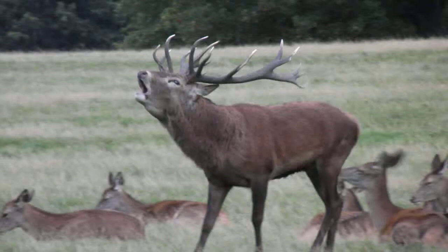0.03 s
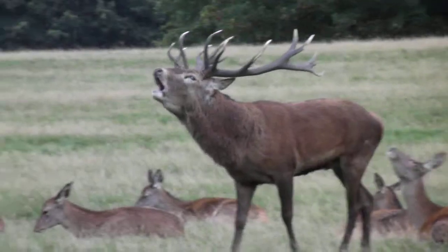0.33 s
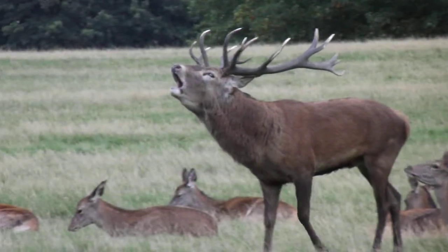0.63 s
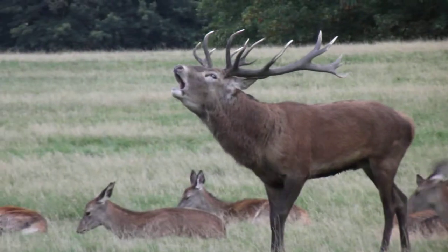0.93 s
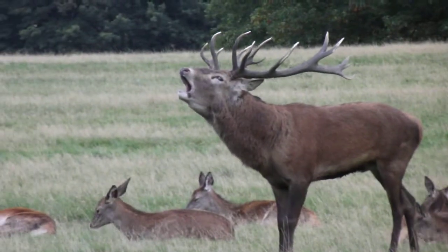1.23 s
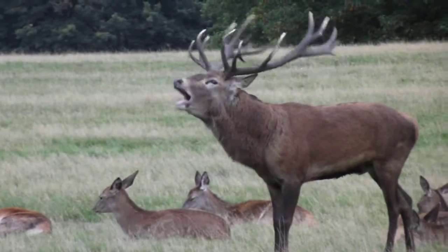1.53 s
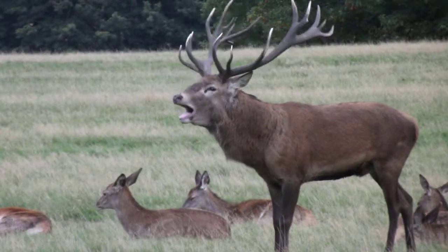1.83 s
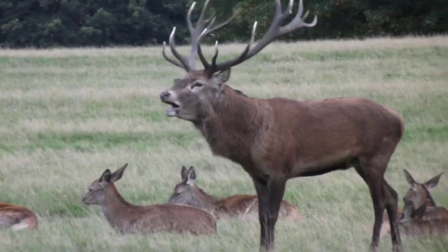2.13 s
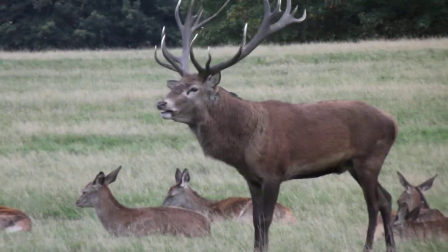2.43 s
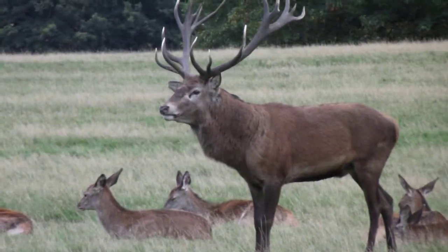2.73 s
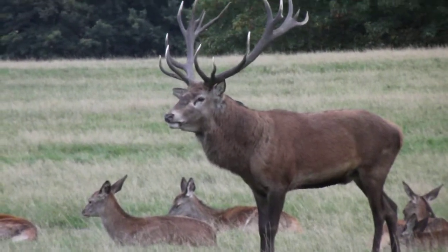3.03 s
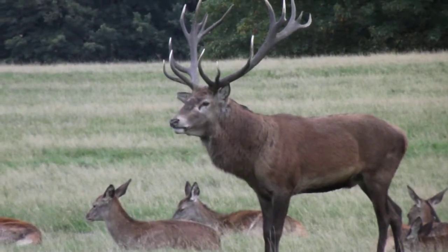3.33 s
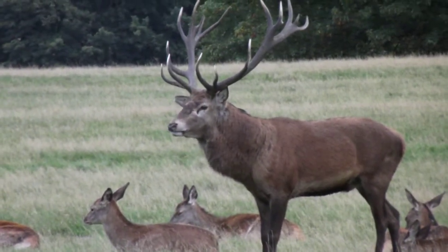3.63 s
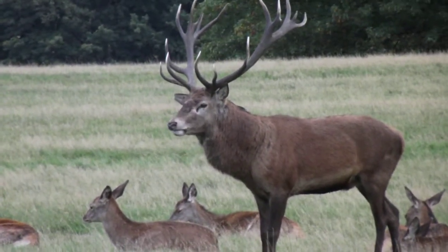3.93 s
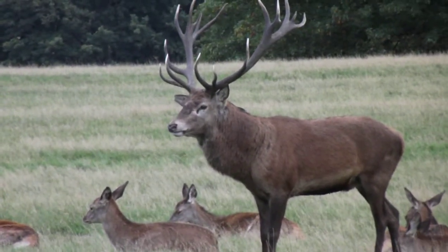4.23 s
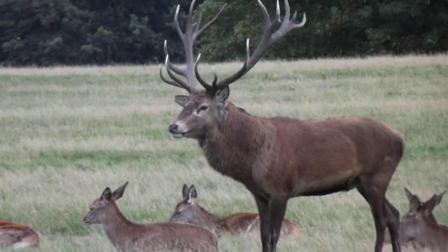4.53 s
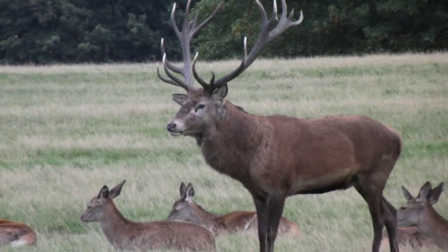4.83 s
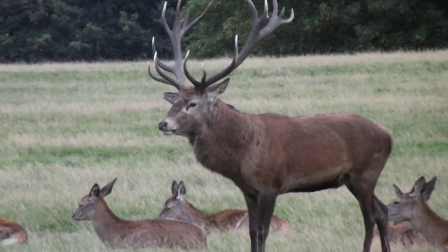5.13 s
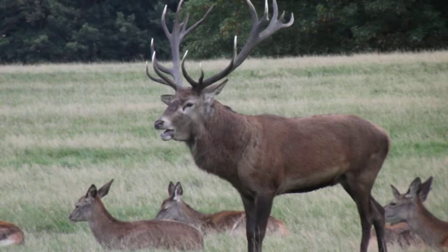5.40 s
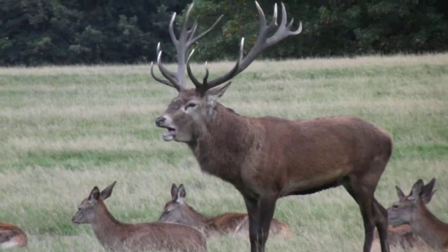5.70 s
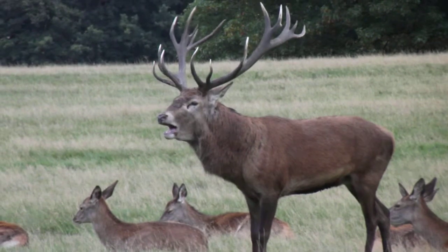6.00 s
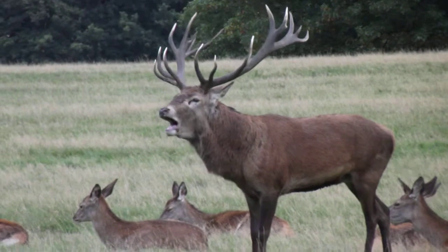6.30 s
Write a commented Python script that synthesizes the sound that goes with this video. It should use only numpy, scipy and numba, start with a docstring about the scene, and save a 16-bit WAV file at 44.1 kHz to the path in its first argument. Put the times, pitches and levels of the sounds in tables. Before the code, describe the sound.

A deer's sustained roar ends in a rasp; faint bird chirps and quick shutter clacks follow over low rumble before a growl builds.

```python
"""Red deer stag roaring in parkland

One long clear call breaks up at its end; later a slow growl speeds up into the next call.
Vocal fold pulses ring the many resonances of his long throat, and the tree line sends back a soft echo.
Around him: low rumble, soft air, a far drone, a faint small bird, one sharp tick, a quick run of
dry clacks and a camera's thin whine."""
import sys
import numpy as np
from scipy import signal
from scipy.fft import rfft, irfft
from scipy.io import wavfile
from scipy.ndimage import uniform_filter1d
from numba import njit

SR = 44100
rng = np.random.default_rng(int(sys.argv[2]) if len(sys.argv) > 2 else 0)


def persist_wave(psi):
    """Save psi, clipped to +-1, as 16-bit WAV."""
    counts = np.round(np.clip(psi, -1, 1) * 32767).astype(np.int16)
    wavfile.write(sys.argv[1], SR, np.atleast_2d(counts).T)


N = 284886
TIME = np.arange(N) / SR
FREQ = np.arange(N // 2 + 1) * SR / N
START_S = .072  # the sound opens here, on a pulse of the roar


def undb(db):
    """Decibels to gain."""
    return 10 ** (np.asarray(db) / 20)


def unit(x):
    """Scale to rms 1."""
    return x / np.sqrt(np.mean(x ** 2))


def steady(x):
    """Hold the short-term rms near 1."""
    size = SR // 16
    power = uniform_filter1d(uniform_filter1d(x ** 2, size), size)
    return x / np.sqrt(np.abs(power) + 1e-12)


def noise():
    """White noise."""
    return rng.standard_normal(N)


def walk(rate_hz):
    """Smooth random wander with rms 1."""
    size = max(int(SR / rate_hz), 1)
    return unit(uniform_filter1d(uniform_filter1d(noise(), size), size))


def curves(table):
    """The columns of a table, joined by straight lines in time."""
    times, *columns = np.transpose(table)
    return [np.interp(TIME, times, column) for column in columns]


def since(start_s):
    """Seconds gone by since the start, 0 before it."""
    return np.maximum(TIME - start_s, 0)


def bump(centre_s, width_s):
    """A bell-shaped swell of height 1."""
    return np.exp(-((TIME - centre_s) / width_s) ** 2)


def ease(before, after, centre_s, width_s):
    """A smooth move from one value to another."""
    return before + (after - before) * (1 + np.tanh((TIME - centre_s) / width_s)) / 2


def gate(start_s, end_s=7, fade_s=.001):
    """1 between start and end, with straight fades outside."""
    return np.interp(TIME, [start_s - fade_s, start_s, end_s, end_s + fade_s], [0, 1, 1, 0])


def colour(x, points):
    """Filter by a (freq_hz, gain_db) outline."""
    hz, db = np.transpose(points)
    return irfft(rfft(x) * undb(np.interp(np.log(FREQ + 1), np.log(hz), db)), N)


def resonate(x, modes, skirt=.53):
    """Filter by (centre_hz, width_hz, gain_db) resonances; a higher skirt is steeper."""
    power = sum(undb(db) ** 2 / (1 + ((FREQ - hz) / width * 2) ** 2 / skirt) ** (2 * skirt)
                for hz, width, db in modes)
    return irfft(rfft(x) * np.sqrt(power), N)


@njit
def band(x, hz, width_hz):
    """State-variable band-pass whose centre moves."""
    y, mid, low = np.empty(len(x)), 0., 0.
    for i in range(len(x)):
        g, damping = np.tan(np.pi * hz[i] / SR), width_hz / hz[i]
        v = (mid + g * (x[i] + 1e-18 - low)) / (1 + g * (g + damping))
        mid, low = 2 * v - mid, low + 2 * g * v
        y[i] = damping * v
    return y


def lag(x, seconds):
    """Delay by a time that may differ from one frequency to the next."""
    cycles = np.cumsum(seconds + 0 * FREQ) * SR / N
    return irfft(rfft(x) * np.exp(-2j * np.pi * cycles), N)


# Two faint high tones: pitch_hz, level_db
WHINE_TONES = [(8021, -76), (11472, -72.5)]


def whine():
    """A camera's thin, steady whine."""
    return sum(undb(db) * np.sqrt(2) * np.sin(2 * np.pi * hz * TIME) for hz, db in WHINE_TONES)


# Broad tone of still air: freq_hz, gain_db
AIR_EQ = [(250, 4.5), (600, 4.5), (1100, -1), (1900, -5.5), (3300, -3.5), (4100, -16), (5500, -20),
          (6800, -20), (8000, -14.5), (9500, -18), (10300, -22), (15500, -26)]
# Bands that tint the air: centre_hz, width_hz, gain_db
AIR_BANDS = [(1460, 110, 0), (1640, 130, -4), (2100, 330, -1), (2600, 150, -6), (3130, 250, -5)]


def air():
    """A soft bed of air noise whose level wavers slightly."""
    bed = undb(-44) * unit(colour(noise(), AIR_EQ))
    tint = undb(-45) * unit(resonate(noise(), AIR_BANDS))
    return (bed + tint) * undb(walk(9) / 2)


# Tone of the rumble's deep and upper layers: freq_hz, gain_db
DEEP_EQ = [(8, -11.5), (24, 1.5), (48, 1), (68, -7), (110, -17), (1000, -99)]
UPPER_EQ = [(45, -37), (80, -7), (118, 0), (150, -6.5), (240, -14), (400, -32), (2500, -84)]
# Swells on top of the resting rumble: centre_s, half_length_s, deep_db, upper_db
RUMBLE_SWELLS = [(.2, .6, -48, -43), (3.6, 0.68, -32.5, -80), (4.558, 0.17, -26.5, -38),
                 (4.733, 0.23, -39, -34.5), (5.95, 0.85, -35, -39)]


def rumble():
    """Two layers of low noise that swell and settle."""
    deep, upper = undb(-33.5), undb(-44)
    for centre_s, width_s, deep_db, upper_db in RUMBLE_SWELLS:
        swell = bump(centre_s, width_s)
        deep = np.hypot(deep, undb(deep_db) * swell)
        upper = np.hypot(upper, undb(upper_db) * swell)
    return unit(colour(noise(), DEEP_EQ)) * deep + unit(colour(noise(), UPPER_EQ)) * upper


def drone():
    """A far band of noise that comes up in level, then climbs in pitch."""
    db = ease(-59, -42.5, centre_s=4.04, width_s=.31)
    hz = ease(189, 450, centre_s=5.2, width_s=.11)
    hum = steady(band(noise(), hz, 340.))
    return colour(hum, [(60, 14.5), (130, 4), (800, -1), (1300, -1.5), (4000, -37)]) * undb(db)


def tree_echo(x, delay_s=.1, decay_s=.12, echo_db=-15):
    """Scattered echo: thin returns from the grass, then a soft cluster from the tree line."""
    t = TIME[:SR]
    envelope = np.exp(-np.abs(t - delay_s) / decay_s) * (t > .01)
    response = envelope * rng.standard_normal(SR)
    return undb(echo_db) * signal.fftconvolve(x, response / np.linalg.norm(response))[:N]


# Falling bird notes: start_s, length_s, start_hz, level_db
BIRD_NOTES = [(2.25, .065, 3850, -53), (2.475, .085, 3700, -46.5), (2.72, .09, 3950, -48),
              (2.98, .085, 3920, -47.5), (3.475, .05, 3750, -52), (3.545, .05, 4000, -51),
              (3.76, .05, 3950, -51), (4.67, .06, 3620, -48.5)]


def bird(fall_hz_per_s=12000):
    """Thin, fluttering whistles: each falls steeply, eases and drops again, loudest past its middle."""
    notes = np.zeros(N)
    for start_s, length_s, start_hz, db in BIRD_NOTES:
        along = np.clip((TIME - start_s) / length_s, 0, 1)
        hz = start_hz - fall_hz_per_s * length_s * (along + np.sin(2 * np.pi * along) / 10)
        swell = np.sqrt(2) * np.sin(np.pi * along ** 1.56)
        notes += undb(db) * swell * np.sin(2 * np.pi * np.cumsum(hz) / SR)
    return notes * undb(3 * walk(200))


# Run of double clacks: start_s, first_db, second_db
CLACK_PAIRS = [(3.326, -32, -30.5), (3.4245, -30.5, -29), (3.5225, -32.5, -31.5), (3.626, -34.5, -39)]
# Their hard, dry tone: freq_hz, gain_db
CLACK_EQ = [(700, -33), (1500, -20), (2150, 9), (2600, -5), (3100, 6), (3900, -22), (4600, -16.5),
            (6200, -17), (7500, -12.5), (9500, -28), (14000, -45)]


def clacks(gap_s=.0147, decay_s=.0061):
    """Pairs of short noise cracks, like a camera shutter."""
    envelope = np.zeros(N)
    for start_s, first_db, second_db in CLACK_PAIRS:
        for hit_s, db in [(start_s, first_db), (start_s + gap_s, second_db)]:
            envelope += undb(db) * np.exp(-since(hit_s) / decay_s) * gate(hit_s)
    return unit(colour(noise(), CLACK_EQ)) * envelope


# Ring of the tick: pitch_hz, decay_s, gain_db
TICK_MODES = [(1140, 0.002, -23.5), (1870, .0018, -15.5), (2600, 0.0012, -15.5), (3020, .001, -17),
              (5380, .0009, -32)]


def tick(start_s=.1885, attack_s=.0003):
    """A single hard contact that rings for a millisecond or two."""
    t = since(start_s)
    ring = sum(undb(db) * np.exp(-t / decay_s) * np.sin(2 * np.pi * hz * t)
               for hz, decay_s, db in TICK_MODES)
    return ring * (1 - np.exp(-t / attack_s))


def breath():
    """The stag's last air rushes through the top resonances of his throat as the roar stops."""
    rush = unit(resonate(noise(), [(3100, 660, 0)], skirt=1.8))
    return rush * undb(-42) * bump(centre_s=1.55, width_s=.079)


def folds(hz, start_s, rough, jitter, shimmer, opening, opening_phase, turbulence):
    """Vocal folds: a weak pulse as they open, a strong one as they shut, a turbulent puff each cycle."""
    cycles = np.cumsum(hz * (1 + jitter * rough * walk(150))) / SR
    cycles -= np.interp(start_s, TIME, cycles)

    def pulse(phase):
        samples_away = ((cycles - phase + .5) % 1 - .5) * SR / hz
        return np.exp(-samples_away ** 2 / 2)

    puffs = unit(np.exp(2 * np.cos(2 * np.pi * cycles)) * noise())
    pulses = unit(pulse(0) + opening * pulse(opening_phase))
    pulses *= undb(shimmer * rough * walk(150))
    return pulses + turbulence * rough * puffs, puffs


# Throat with the mouth nearly shut: rest_hz, width_hz, gain_db, larynx_follow (0-1)
NARROW_THROAT = [(600, 230, -13, 0.8), (1670, 91, -8, 1), (2146, 360, 0, 0.96), (3100, 205, -2, 0.1),
                 (3300, 400, -6.5, 0), (3980, 100, -18, 0.3)]
# Throat as the mouth opens: centre_hz, width_hz, gain_db
OPEN_THROAT = [(1134, 110, -10.5), (1520, 96, -19), (2270, 120, -3), (2807, 130, 1), (3160, 340, -2.5),
               (3790, 460, -17)]


def growl(start_s=5.6865, build_s=.775, catch_s=.072, attack_s=.062):
    """Single pulses speed up; the larynx sinks, lengthening the throat and lowering its resonances."""
    t = since(start_s)
    effort = np.minimum(t / build_s, 1)
    # the pulse rate jumps as the folds catch, then climbs with the effort
    hz = 28.47 + 38.46 * (1 - np.exp(-t / catch_s)) + 55.14 * effort ** 1.55
    source, _ = folds(hz, start_s, rough=.18, jitter=.035, shimmer=2,
                      opening=.044, opening_phase=.77, turbulence=.7)
    larynx_sink = .15 * effort ** 1.9
    narrow = np.zeros(N)
    for rest_hz, width_hz, gain_db, follow in NARROW_THROAT:
        centre_hz = rest_hz * (1 - larynx_sink) ** follow
        ring = band(source, centre_hz, float(width_hz))
        narrow += undb(gain_db) * band(ring, centre_hz, float(width_hz))
    # the opening mouth crossfades to a second, unmoving set of resonances
    wide = resonate(source, OPEN_THROAT, skirt=1.06)
    mouth = .097 + .783 * effort ** 2.7
    voice = steady(np.sqrt(1 - mouth) * steady(narrow) + np.sqrt(mouth) * steady(wide))
    db = -35.5 - 7.5 * np.exp(-t / attack_s) + 5.5 * effort ** 4.3  # soft start, late swell
    return voice * undb(db) * gate(start_s, fade_s=.01)


# Melody of the roar, before its final sag: time_s, pitch_hz
ROAR_PITCH = [(0.08, 161.7), (0.208, 159.2), (0.348, 154.4), (0.41, 153), (0.84, 160.9), (1.02, 158.4),
              (1.138, 152.5), (1.282, 149.2), (1.34, 146.3), (1.4, 136.4)]
# Fader moves on the whole roar and on its middle and top resonances: time_s, gain_db, middle_db, top_db
ROAR_EFFORT = [(0.09, -22.5, -6.5, -12.5), (0.228, -23, -1.5, -7), (0.362, -23, -8, -7.5),
               (0.538, -22, -9.5, -8.5), (0.658, -22, -4.5, -8.5), (0.79, -23, -5, -7),
               (1.194, -21.5, -8, -3), (1.28, -21.5, -4, -9), (1.33, -22.5, -6.5, -4)]
# Throat with the neck stretched and the mouth wide: centre_hz, width_hz, gain_db
STRETCHED_THROAT = [(163.4, 40, -14), (507, 92, -11), (772, 44, -15), (1144, 118, -7.5), (1411, 57, -11),
                    (1593, 48, -6.5), (1872, 81, -8.5), (2047, 144, -8), (2248, 270, -7.5),
                    (2879, 205, -0.5), (3078, 176, 3), (3329, 146, 3.5), (3604, 160, -2),
                    (4050, 410, -30.5), (4780, 170, -38.5)]


def roar(tires_s=1.395, end_s=1.52, slacken_s=.098, sag_hz_per_s=370, sag_db_per_s=85):
    """The long call: clean harmonics that sag as the air runs out and turn rough as the folds slacken."""
    tired_s = np.minimum(since(tires_s), end_s - tires_s)
    left_s = np.maximum(end_s - TIME, 0)
    hz = curves(ROAR_PITCH)[0] - sag_hz_per_s * tired_s
    effort_db, middle_db, top_db = curves(ROAR_EFFORT)
    rough = .037 + .703 * np.exp(-left_s / slacken_s)
    # the moment of opening wanders, so single overtones swell and fade
    opening_phase = .64 + .014 * walk(6.7)
    source, puffs = folds(hz, START_S, rough, jitter=.05, shimmer=1.5,
                          opening=.3, opening_phase=opening_phase, turbulence=.57)
    voice = resonate(source, STRETCHED_THROAT, skirt=3)
    # the lower resonances answer later, which smears each pulse
    voice = lag(voice, np.interp(FREQ, [500, 1600, 2200, 3000, 3700], [.003, .0015, .0004, 0, -.0005]))
    # lips and tongue shift weight between the resonances; the top gains as he tires
    middle = colour(voice, [(1650, -60), (1780, 0), (2450, 0), (2650, -60)])
    top = colour(voice, [(3180, -60), (3300, 0)])
    voice = steady(steady(voice - middle - top)
                   + undb(middle_db + 1) * steady(middle)
                   + undb(top_db + 2 + 40 * tired_s) * steady(top))
    # slack folds rattle and fill the gaps between the resonances
    rasp_eq = [(300, -6.5), (1200, -13), (1800, -6), (3400, 2.5), (3800, -15), (4300, -35), (7000, -51.5)]
    voice += undb(.5) * rough * unit(colour(puffs, rasp_eq))
    # one last push of air lifts the voice and the growing hiss at the lips
    push = bump(centre_s=1.461, width_s=.0105)
    voice *= undb(5 * push - sag_db_per_s * tired_s)
    lip_hiss = unit(resonate(puffs, [(8000, 150, 6.5), (9100, 2400, -5)], skirt=2.5))
    lip_hiss *= undb(-33 - 16.5 * left_s + 11.5 * push)
    return (voice + lip_hiss) * undb(effort_db + .3) * gate(0, end_s, fade_s=.022)


def scene(waver_db=.56, left_lag_s=.000022):
    """Stag, clacks, tick and bird echo over the field; the left channel hears them a trifle later."""
    calls = (roar() + growl()) * undb(waver_db * walk(12.6))
    events = calls + breath() + clacks() + tick() + bird()
    mix = events + tree_echo(events) + rumble() + drone() + air() + whine()
    # faint microphone hiss, opposite in the two channels
    hiss = undb(-75) * unit(colour(noise(), [(300, -56), (2000, 9.5), (5000, 10), (15000, 14)]))
    return np.array([lag(mix, left_lag_s) + hiss, mix - hiss])


def record(dry):
    """The sound opens a moment in, and a steep low-pass cuts the very top."""
    top_hz = 15750
    low_pass = signal.ellip(8, .2, 70, top_hz, fs=SR, output="sos")
    return signal.sosfilt(low_pass, dry * gate(START_S + .001))


dry = scene()
out = record(dry)
persist_wave(out)
```